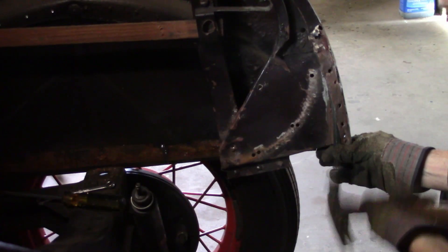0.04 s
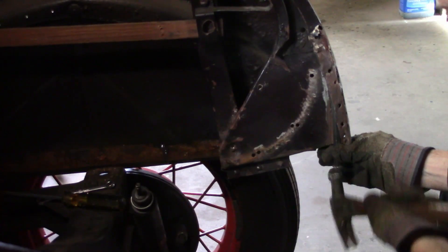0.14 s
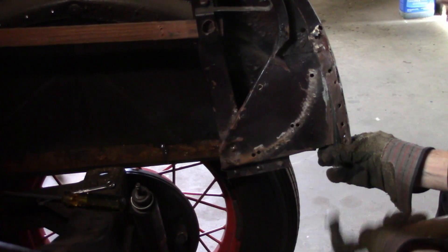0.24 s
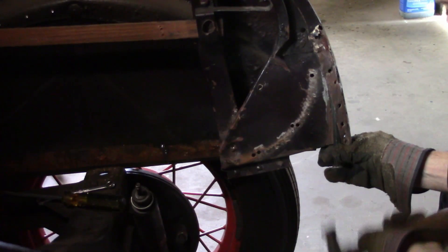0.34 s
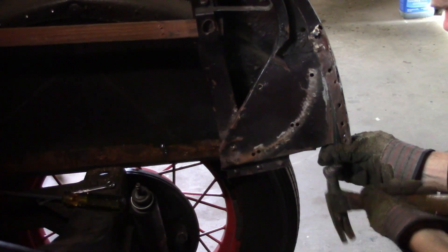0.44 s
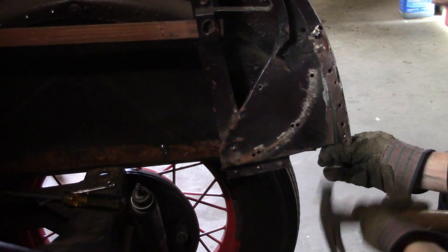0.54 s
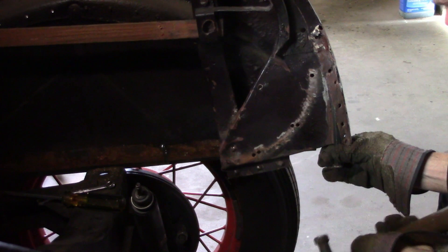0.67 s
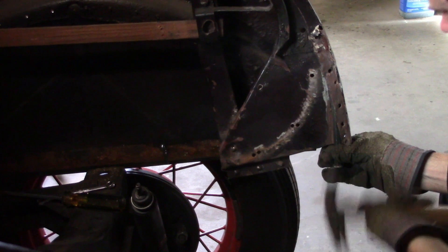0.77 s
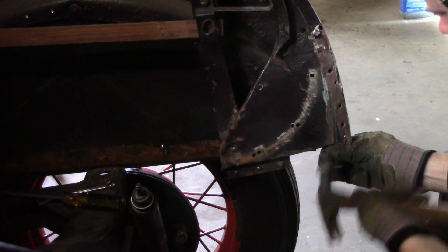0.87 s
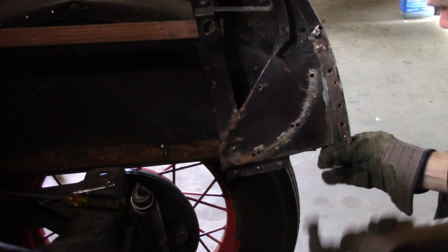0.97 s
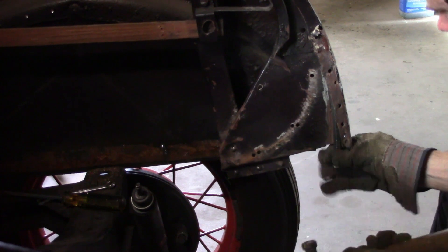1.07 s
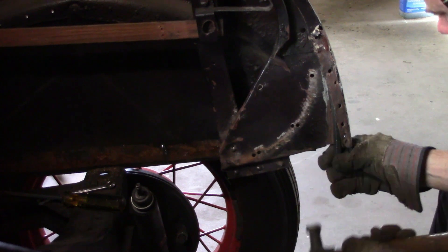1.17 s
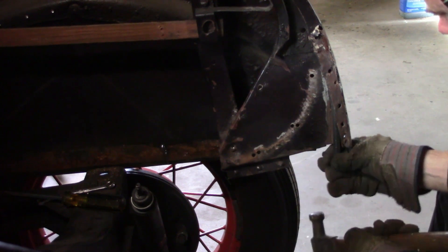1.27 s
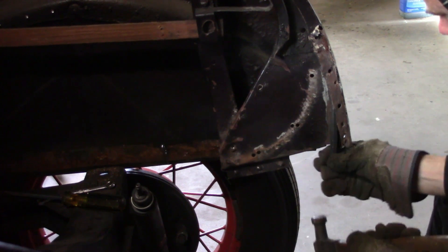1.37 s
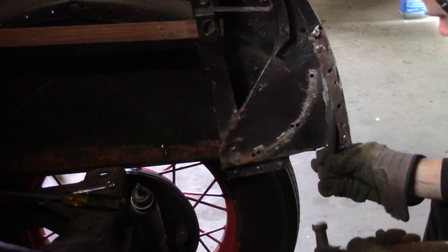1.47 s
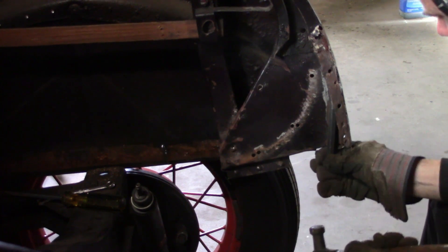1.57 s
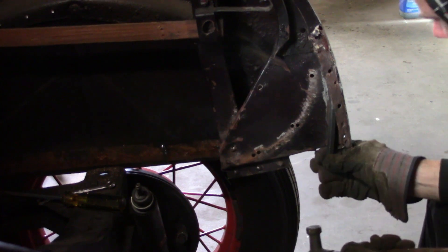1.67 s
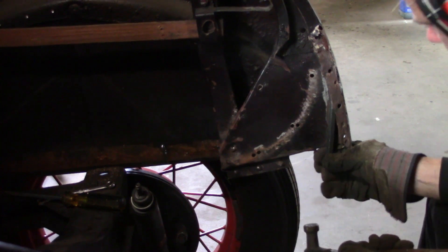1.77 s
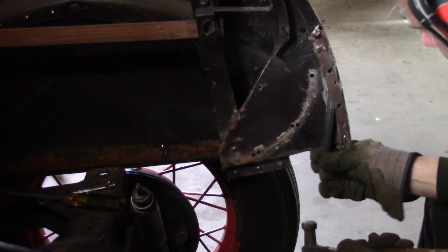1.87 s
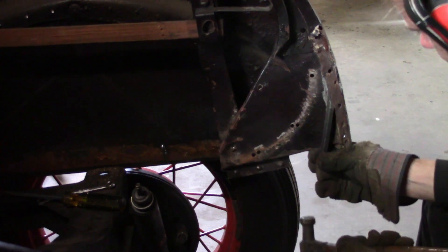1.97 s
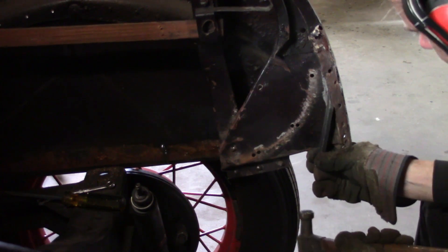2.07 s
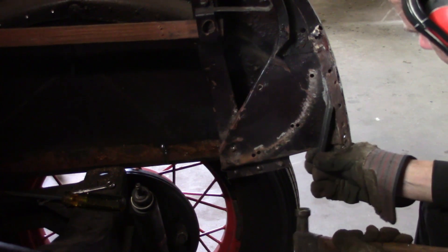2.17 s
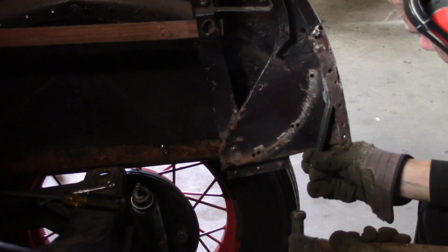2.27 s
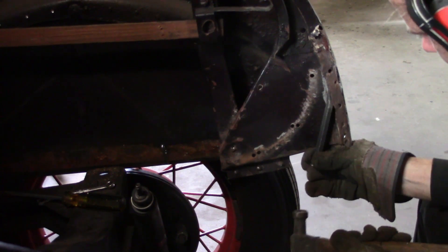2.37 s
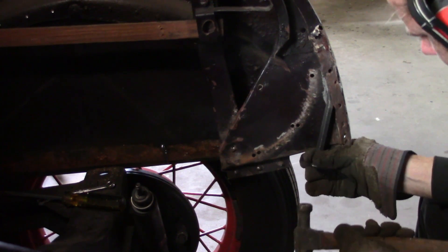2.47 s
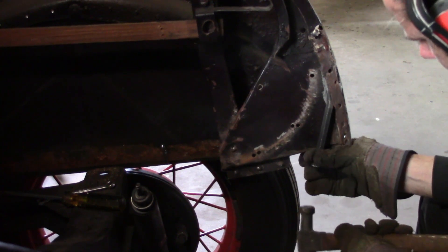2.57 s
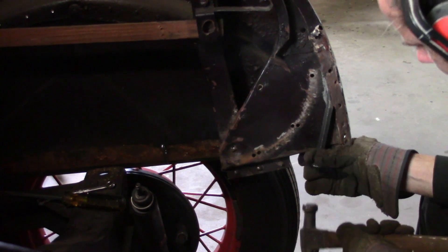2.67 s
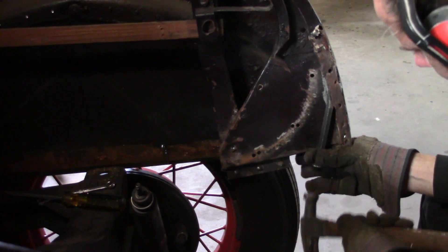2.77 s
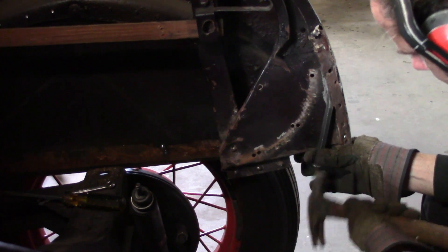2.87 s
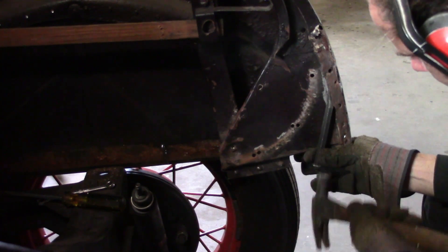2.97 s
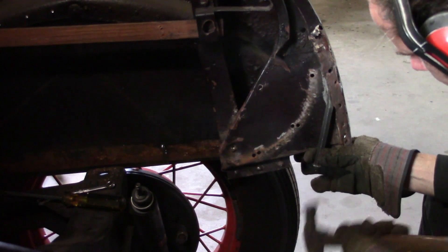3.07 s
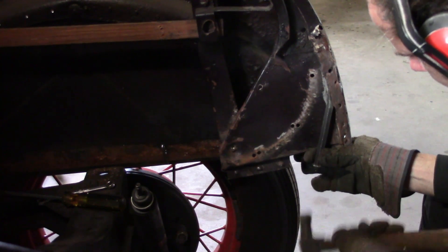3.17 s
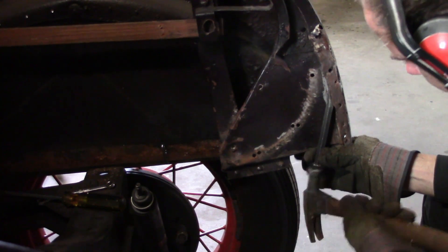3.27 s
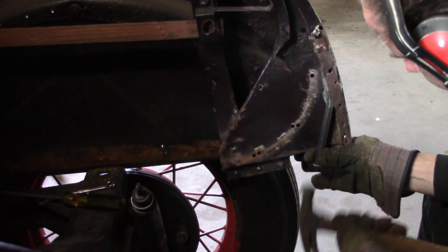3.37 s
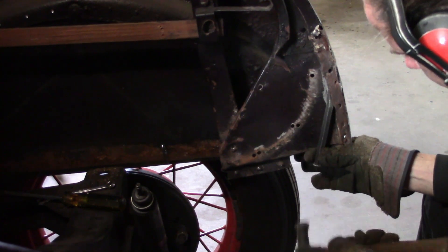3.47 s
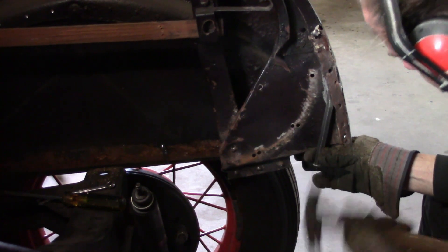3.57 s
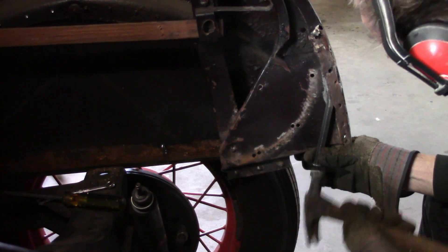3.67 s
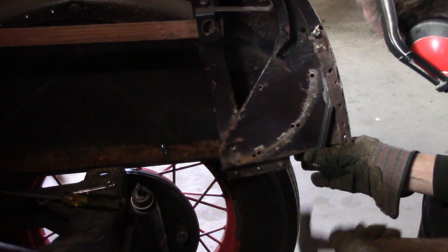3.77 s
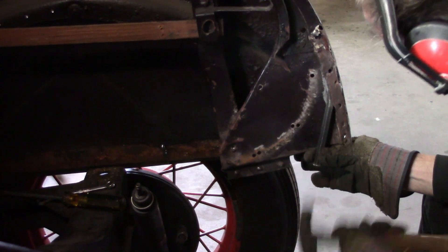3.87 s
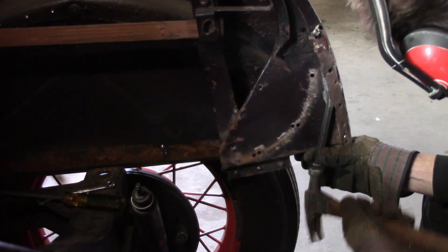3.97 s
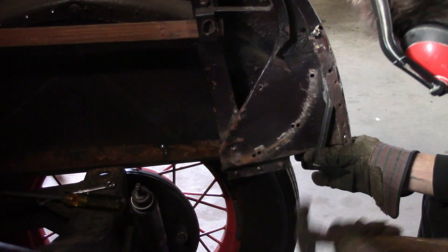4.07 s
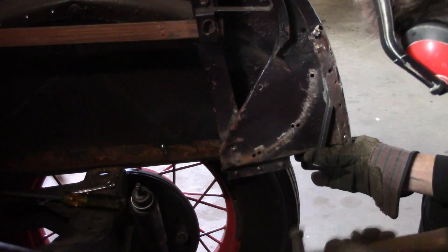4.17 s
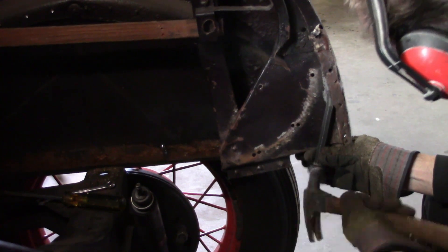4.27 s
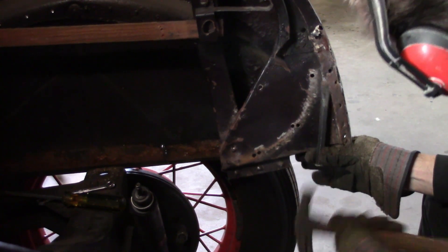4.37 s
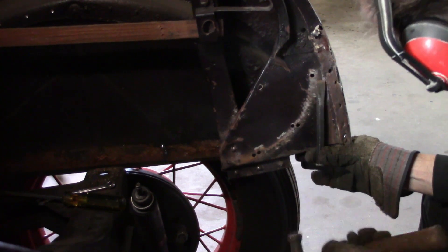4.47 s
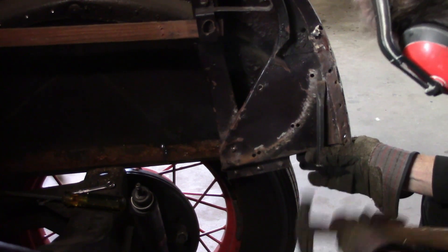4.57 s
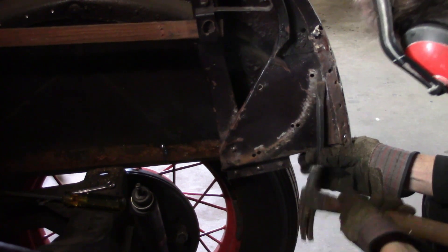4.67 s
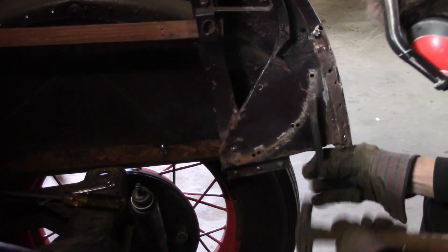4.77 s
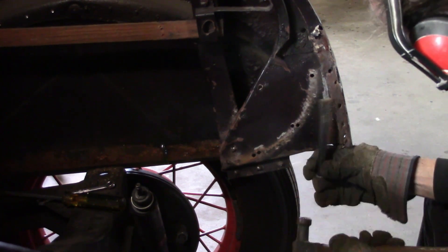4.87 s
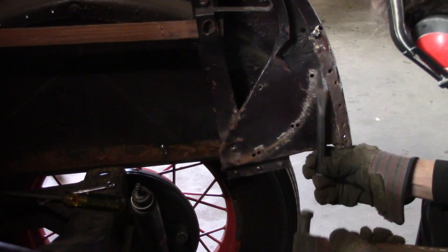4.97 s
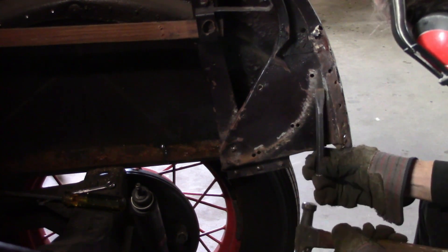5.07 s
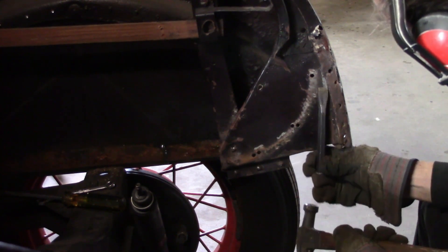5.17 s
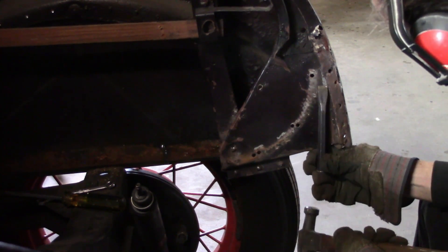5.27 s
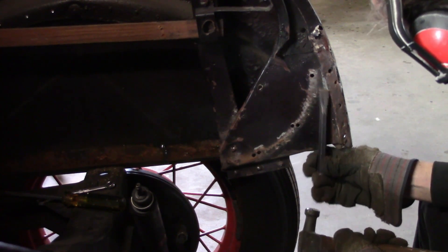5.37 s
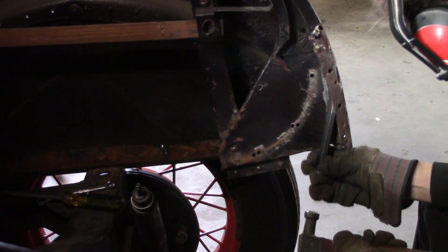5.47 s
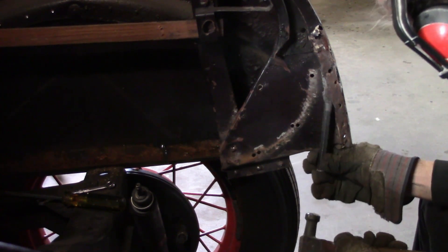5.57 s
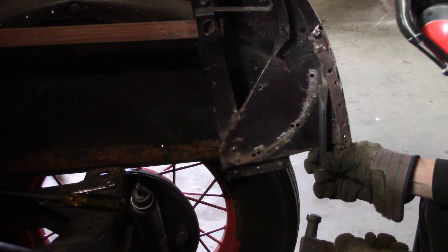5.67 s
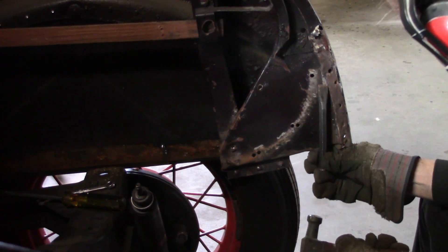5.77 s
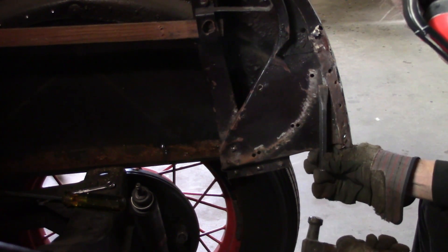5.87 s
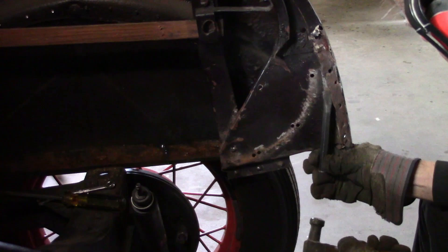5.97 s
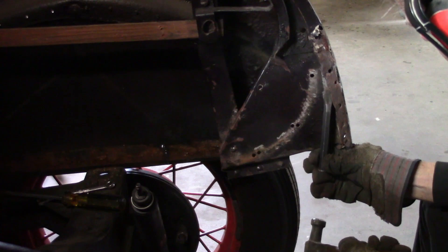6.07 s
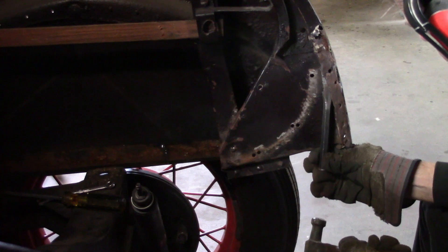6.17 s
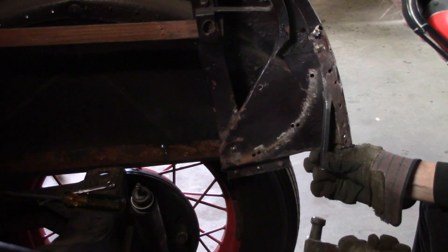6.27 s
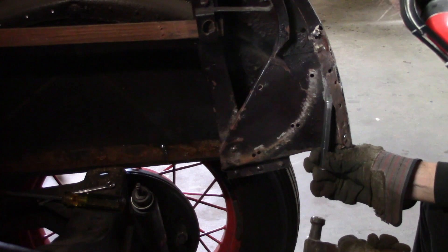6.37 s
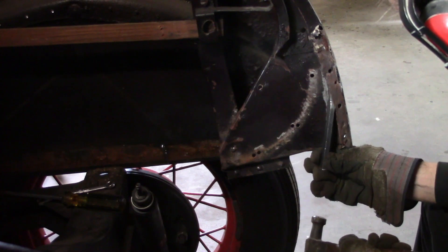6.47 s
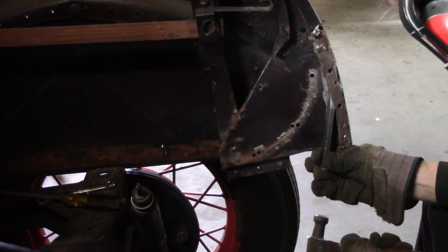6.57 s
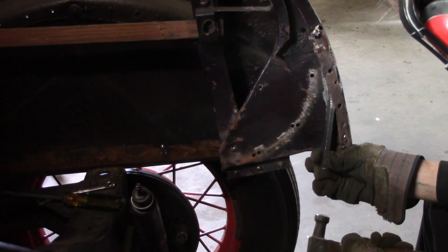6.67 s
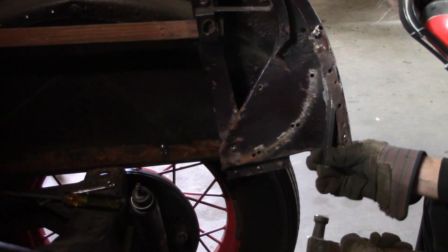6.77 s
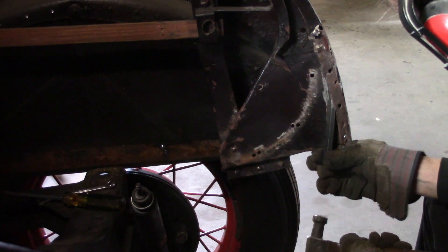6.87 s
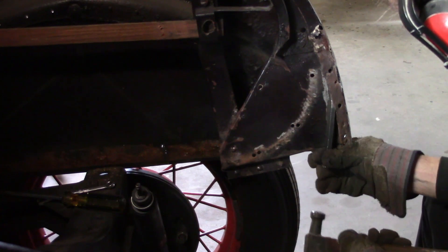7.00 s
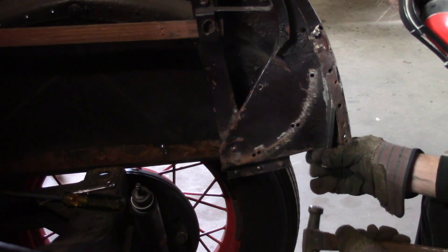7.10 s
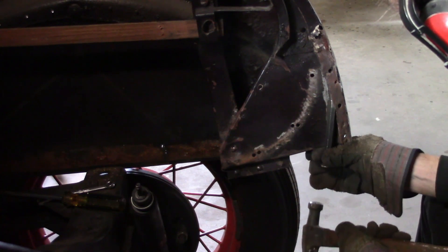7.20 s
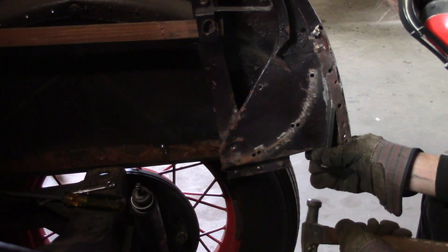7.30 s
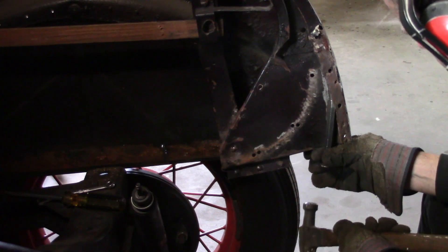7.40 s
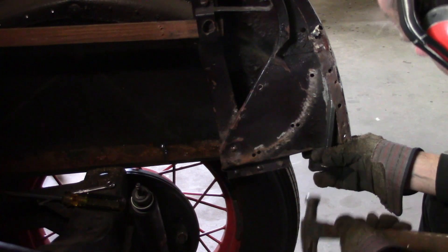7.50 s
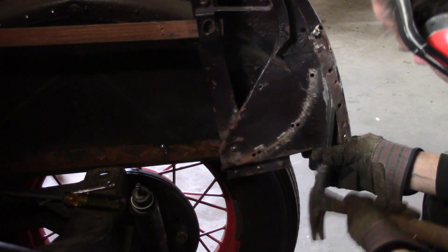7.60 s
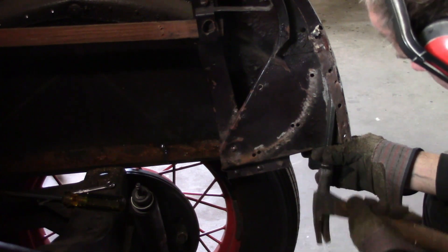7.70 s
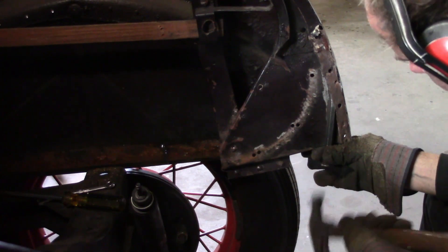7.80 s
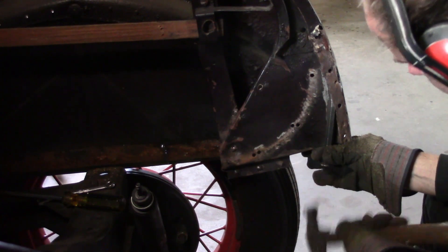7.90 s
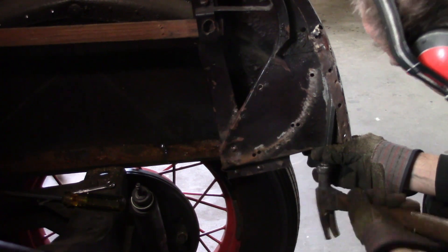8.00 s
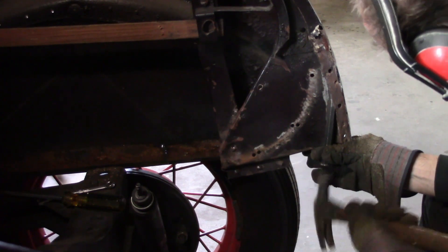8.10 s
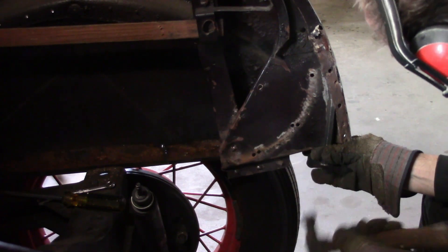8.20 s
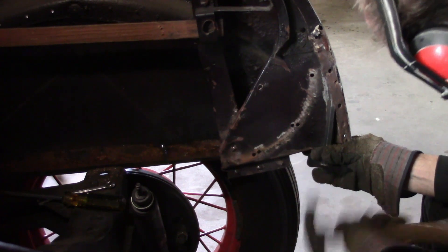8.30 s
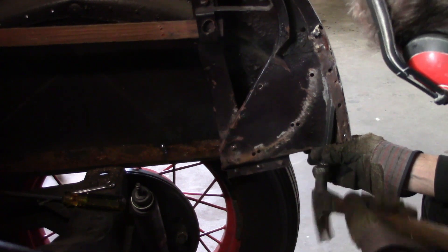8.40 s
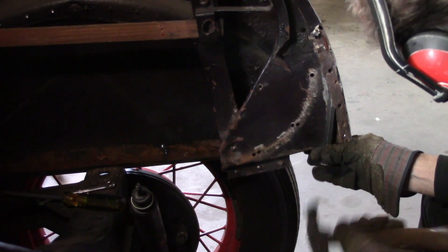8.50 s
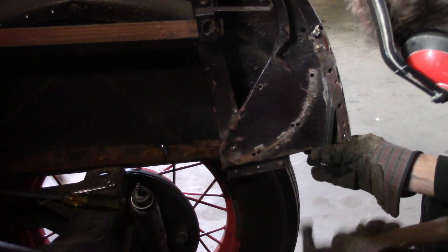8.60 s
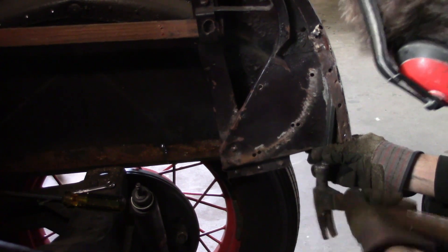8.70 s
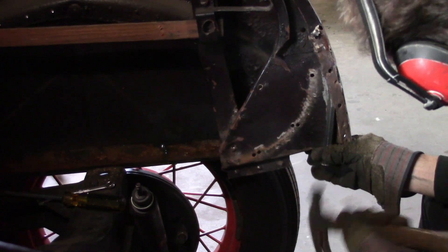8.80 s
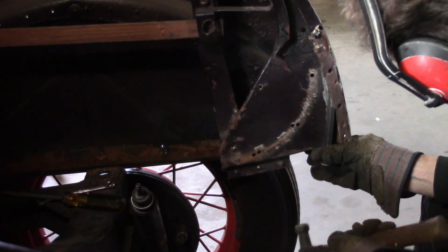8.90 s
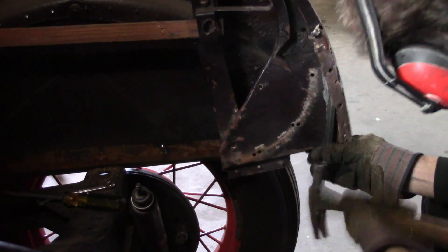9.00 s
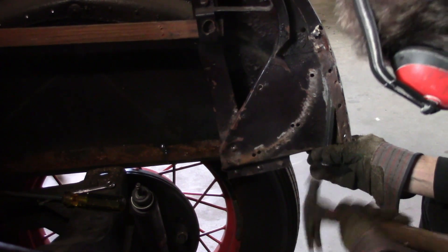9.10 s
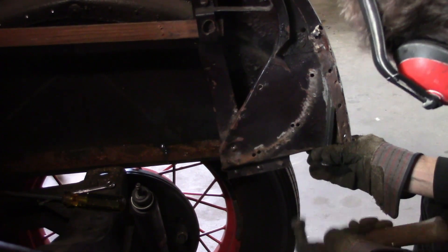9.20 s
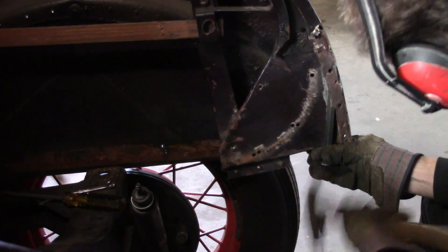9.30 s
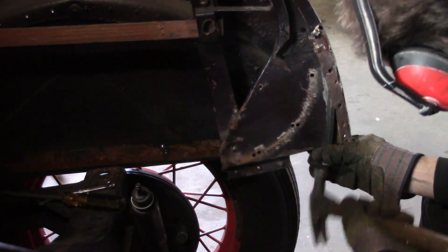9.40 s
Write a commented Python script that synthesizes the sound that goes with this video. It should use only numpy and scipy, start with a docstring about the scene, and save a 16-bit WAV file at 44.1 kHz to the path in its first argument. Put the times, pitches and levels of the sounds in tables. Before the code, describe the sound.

A chisel is hammered into a thin rusty metal panel in bursts of sharp, clattering blows, with quiet repositioning knocks and scratches in the pauses.

```python
"""The clatter of a blow already struck is heard first; three runs of hammer blows follow, through a steel chisel
into a rusty sheet-metal panel in a garage. Between the runs the chisel knocks, scrapes and crumbles rust as it
is moved, and once the hammer just clinks on it. Noise shaped by spectra and dying sines make the metal.
The recorder's limiter flattens each hard blow into a crack and a held clatter, which now and then thins briefly
and then dies away. A faint hush and ticking lie beneath."""
import sys
import numpy as np
from scipy import signal
from scipy.fft import rfft, irfft
from scipy.io import wavfile
from scipy.ndimage import uniform_filter1d, minimum_filter1d

SR = 44100
rng = np.random.default_rng(int(sys.argv[2]) if len(sys.argv) > 2 else 0)


def write(x):
    x = np.atleast_2d(x).T
    wavfile.write(sys.argv[1], SR, np.round(np.clip(x, -1, 1) * 32767).astype(np.int16))


N = 416744  # length [samples]
T = np.arange(SR) / SR  # time since a contact [s]


def amp(db):
    """Decibels to gain."""
    return 10 ** (np.asarray(db) / 20)


def evened(x):
    """Scaled to rms 1."""
    return x / np.sqrt(np.mean(x ** 2) + 1e-20)


def dying(t, t60):
    """A decay of 60 dB in t60 seconds."""
    return np.exp(-np.log(1000) * t / t60)


def read(points, hz):
    """A table of (frequency, value) read on a log-frequency axis."""
    table_hz, value = np.transpose(points)
    return np.interp(np.log(hz + 1), np.log(table_hz + 1), value)


def add(mix, s, sound):
    """Mixes a sound in from time s on; whatever falls before the start is cut."""
    start = round(s * SR)
    sound = sound[max(-start, 0):]
    part = mix[max(start, 0):][:len(sound)]
    part += sound[:len(part)]


def noise(spectrum, size):
    """Noise of rms 1 with the given spectrum."""
    gain = amp(read(spectrum, np.fft.rfftfreq(size, 1 / SR)))
    return evened(irfft(rfft(rng.standard_normal(size)) * gain, size))


def ring(modes, uneven_db):
    """Dying sines in random phase; each contact can share its energy among them a little differently."""
    hz, db, t60 = np.float32(modes).T[:, :, None]
    phase, share = np.float32(rng.random((2, len(modes), 1)))
    t = np.float32(T)
    fade = np.exp(-np.float32(np.log(1000)) * t / t60)
    level = amp(db + uneven_db * (2 * share - 1.5))
    return (level * fade * np.sin(2 * np.pi * (hz * t + phase))).sum(0)


def nearness(hz, lip_hz):
    """1 on the lip's own note, falling to 0 away from it."""
    width_hz = 50 + .07 * lip_hz
    return 1 / (1 + ((hz - lip_hz) / width_hz) ** 2)


# how fast the clatter dies, band by band: (frequency [Hz], t60 [s])
CLATTER_DECAY = [(150, 0.72), (350, 0.56), (600, 0.45), (1100, 0.44), (2200, 0.35), (4500, 0.36),
                 (10000, 0.34)]


def clatter(spectrum, tint, swell_s, lip_hz, lip_db, cluster_db=2.5, drift_db=3.0, lip_fade_s=0.47):
    """Countless modes dying band by band; a lip of torn metal briefly lifts those near its own note."""
    hz, t, z = signal.stft(noise(spectrum, SR), SR, nperseg=1024)
    # each point of contact favours its own clusters of upper modes, and they drift as the sheet flexes back
    clusters = evened(uniform_filter1d(rng.standard_normal((len(hz), 1)), size=3, axis=0))
    drift = uniform_filter1d(rng.standard_normal(z.shape), size=4, axis=0)
    drift = evened(uniform_filter1d(drift, size=9, axis=1))
    upper_share = (hz / (hz + 250))[:, None]
    lumps_db = (cluster_db * clusters + drift_db * drift) * upper_share
    z = z * amp(read(tint, hz)[:, None] + lumps_db - 0.5)
    # the lip's note sinks back into the clatter
    z *= amp(lip_db * nearness(hz, lip_hz)[:, None] * np.exp(-t / lip_fade_s))
    z *= dying(t, read(CLATTER_DECAY, hz)[:, None])
    # slow bending waves need time to fill the panel and the room, so the bass swells in late
    band_swell_s = swell_s * (260 / (hz[:, None] + 1)) ** 0.76
    z *= np.sqrt(1 - np.exp(-(t + 0.0048) / band_swell_s))
    return signal.istft(z, SR, nperseg=1024)[1][:SR]


# centres of boom, thunk, body, clang and fizz, the bands that colour a contact: (frequency [Hz])
BAND_HZ = [170, 450, 950, 2300, 6500]


def sheet(colour, modes, spectrum, modes_db, swell_s, lip_hz, lip_db, lip_share=0.62):
    """The sheet metal's answer to one contact; the colour depends on where and how firmly the chisel bites."""
    tint = list(zip(BAND_HZ, [colour[0], 0, *colour[1:]]))  # the thunk is the 0 dB reference
    tinted = []
    for hz, db, t60 in modes:
        lift_db = lip_share * lip_db * nearness(hz, lip_hz)
        tinted.append((hz, db + read(tint, hz) + lift_db, t60))
    clear = ring(tinted, uneven_db=0.0) * (1 - np.exp(-T / swell_s))
    return clatter(spectrum, tint, swell_s, lip_hz, lip_db) + amp(modes_db) * clear


def tilted(colour, db_per_octave):
    """A colour tipped about the thunk: a sharp contact is brighter, a blunt one duller."""
    boom_hz, thunk_hz, *upper_hz = BAND_HZ
    octaves = np.log2(np.array([boom_hz, *upper_hz]) / thunk_hz)
    return np.array(colour) + db_per_octave * octaves


# the crack of steel on steel: (frequency [Hz], density [dB per Hz])
CRACK_SPECTRUM = [(40, -56), (100, -39.5), (500, -7), (2000, 3.5), (4000, -2.5), (7000, -0.5), (11000, -6),
                  (16000, -27)]


def crack(length_s):
    """The bright first milliseconds of a contact, as noise that dies exponentially."""
    return noise(CRACK_SPECTRUM, SR) * np.exp(-T / length_s)


# the wash of the chisel shank's close, hand-damped modes: (frequency [Hz], density [dB per Hz])
ZING_SPECTRUM = [(20, -70), (4800, -35), (5600, -8), (5900, 0), (6250, 0), (6500, -14), (7500, -35),
                 (16000, -60)]


def zing(t60):
    """The chisel's shank: modes too close to tell apart, as a narrow band of dying noise."""
    return noise(ZING_SPECTRUM, SR) * dying(T, t60)


# the panel's countless modes, blurred by the garage: (frequency [Hz], density [dB per Hz])
PANEL_WASH = [(30, -37.5), (80, -52.5), (110, -4.5), (170, -2.5), (330, 4), (560, 0), (1100, -5.5),
              (2500, -5), (3700, -17.5), (6400, -21.5), (8200, -25.5), (10300, -31), (12500, -40.5),
              (16000, -47)]


def passing_modes(db=-23, count=30):
    """Upper modes that come and go as the chisel's point moves along the seam; they die with the clatter."""
    # one at random in each of the even log-frequency steps from 800 to 7200 Hz
    mode_hz = 800 * 9 ** ((np.arange(count) + rng.random(count)) / count)
    return [(hz, db + read(PANEL_WASH, hz), read(CLATTER_DECAY, hz)) for hz in mode_hz]


# clearest modes of the panel: (frequency [Hz], level [dB], t60 [s])
PANEL_MODES = [(164.5, -26.5, 0.96), (178, -16, 0.73), (228.4, -28, 0.94), (257, -16, 0.62),
               (338, -32, 0.92), (332, -8.5, 0.59), (368, -3, 0.33), (469, -31.5, 0.88), (507, -13, 0.55),
               (573.5, -13.5, 0.56), (606, -12, 0.46), (643, -12.5, 0.39), (757, -20, 0.45),
               (893, -17.5, 0.46), (986, -20, 0.3), (1137, -13, 0.39), (1465, -20, 0.26),
               (1602, -18.5, 0.45), (1930, -15.5, 0.25), (2044, -16, 0.39)]
# the chisel pressed into the panel; its main note is a beating pair: (frequency [Hz], level [dB], t60 [s])
WEDGED_CHISEL_MODES = [(3780, -3, .22), (5650, -3, .2), (5895, -3, .22), (6207, 1, .22), (6682, 7, .36),
                       (6689, 0, .36), (7105, -1, .22), (7220, -3, .22)]
# hard blows: (time [s], force [dB], cut-off of the contact [Hz], ring of the chisel [dB],
# zing of its shank [dB], note of the torn lip of metal [Hz], its lift [dB], boom [dB], body [dB], clang [dB])
HARD_BLOWS = [(-.045, -11, 9600, -8, -3.5, 1350, 8.5, -1.5, 0, 1),
              (.332, -10, 6960, -13, -17, 1500, 10, 3.5, 0.5, -2),
              (.712, -11.5, 5500, -24, -14, 1780, 6.5, -6.5, 2.5, 2),
              (2.818, -20, 4600, -14.5, -6.5, 1700, 10, -4.5, -2, 1.5),
              (3.174, -8, 11100, -12, -7, 1210, 7.5, -3, -3, 2.5),
              (3.523, -6, 9500, -12.5, -28, 4400, 11, -3, -1, 0),
              (3.845, -4.5, 13500, -36, -30, 4000, 5, -4.5, -0.5, 2),
              (4.179, -1.5, 13400, -39, -13, 2050, 10, -5, -0.5, -1),
              (7.541, -15.5, 13070, -12.5, -9.5, 2940, 8.5, -10.5, 0, -2.5),
              (7.903, -8.5, 8700, -30, -30, 2040, 4, -1.5, 3, 1.5),
              (8.277, -5.5, 12100, -30, -8, 2680, 6.5, -4.5, 2.5, 0.5),
              (8.609, -5.5, 13100, -38, -14, 2000, 10.5, -3.5, 5.5, -2.5),
              (8.937, -7.5, 11600, -8, -7, 890, 7.5, -3.5, -1, 2.5),
              (9.256, -6, 13500, -13, -9.5, 2600, 6, -7.5, 1, -2)]


def hammering(crack_db=4, chisel_db=-5.0, fizz_db=5.5):
    """Each blow cracks, rings the chisel and shakes the whole panel; a longer contact cuts the top."""
    out = np.zeros(N)
    for s, force_db, contact_hz, ring_db, zing_db, lip_hz, lip_db, *colour in HARD_BLOWS:
        steel = amp(crack_db) * crack(length_s=0.011)
        steel += amp(chisel_db + ring_db) * ring(WEDGED_CHISEL_MODES, uneven_db=1.5)
        steel += amp(zing_db) * zing(t60=.3)
        body = sheet([*colour, fizz_db], PANEL_MODES + passing_modes(), PANEL_WASH,
                     modes_db=0.5, swell_s=0.014, lip_hz=lip_hz, lip_db=lip_db)
        contact = signal.butter(N=2, Wn=min(contact_hz, SR * .45), fs=SR, output="sos")
        add(out, s, amp(force_db) * signal.sosfilt(contact, steel + body))
    return out


# the hush of the garage: (frequency [Hz], density [dB per Hz])
HUSH_SPECTRUM = [(15, -76), (25, -47.5), (120, -6), (560, -7.5), (714, -12.5), (840, -14), (1610, -14.5),
                 (2000, -18.5), (3340, -25), (3720, -24), (4030, -26), (16000, -39)]


def background(hush_db=-71.5, tick_db=-60, clearest_s=2.3885, ticks_per_s=15, tick_hz=1800, tick_s=.003,
               fade_db_per_s=2.0):
    """Steady shaped noise for the hush, and a faint regular ticking of short sines that rises and fades."""
    t = np.arange(N) / SR - clearest_s
    index, since = np.divmod(t, 1 / ticks_per_s)
    uneven_db = -3 * rng.random(256)[index.astype(int)]
    ticks = amp(uneven_db) * np.sin(2 * np.pi * tick_hz * since) * np.exp(-since / tick_s)
    return amp(hush_db) * noise(HUSH_SPECTRUM, N) + amp(tick_db - fade_db_per_s * abs(t)) * ticks


# clearest modes of the loose edge, with no chisel wedged against it: (frequency [Hz], level [dB], t60 [s])
EDGE_MODES = [(378.5, -5.5, 0.48), (464, -20, 0.67), (516.5, -17, 0.58), (563, -19, 0.55), (612, -33, 0.4),
              (678.4, -11.5, 0.43), (686, -24, 0.8), (753, -20.5, 0.62), (901, -13.5, 0.35),
              (987, -20.5, 0.54), (1170, -11, 0.26), (1225, -21.5, 0.49), (1458, -17, 0.19),
              (1600, -20, 0.42), (1680, -29, 0.47), (1910, -20, 0.2), (2080, -24, 0.46), (2670, -19.5, 0.2),
              (2780, -20.5, 0.29), (2950, -22.5, 0.21), (3300, -18, 0.18), (3435, -20.5, 0.28),
              (3640, -21.5, 0.2)]
# the wash of its other modes: (frequency [Hz], density [dB per Hz])
EDGE_WASH_SPECTRUM = [(30, -48.5), (75, -38), (115, 1), (200, 1), (280, 0.5), (420, 1), (1150, -4.5),
                      (1400, -6.5), (2000, -7), (2300, -14), (2750, -7.5), (3400, -10.5), (4200, -13),
                      (6400, -12), (10300, -22.5), (16000, -54)]


def loose_edge(colour, modes_db, swell_s, lip_hz, lip_db, ring_share=1):
    """The panel's loose edge answers a contact; the share scales how long its clear modes ring."""
    modes = [(hz, db, t60 * ring_share) for hz, db, t60 in EDGE_MODES]
    return sheet(colour, modes, EDGE_WASH_SPECTRUM, modes_db, swell_s, lip_hz, lip_db)


# the chisel knocks on the loose edge as it is set: (time [s], force [dB], brightness [dB per octave],
# note of the touched lip of metal [Hz], boom [dB], clang [dB], ring time [share of the free edge's])
CHISEL_KNOCKS = [(1.2, -55.5, -1.5, 293, 4.5, -5, 0.55), (1.432, -51.5, -6, 317, -4.5, -1, .3),
                 (1.485, -54, -14, 356, -17.5, -7.5, 0.33), (2.0563, -20, -3, 800, -19, -4.5, 0.53),
                 (2.2, -44, -2.5, 433, -6.5, -8, 0.68), (4.928, -21.5, 0.65, 1000, -19, -11, 1.11),
                 (5.075, -39.5, 1, 660, 0.5, -4, 0.58), (5.375, -37, 3, 900, -10, 2, 0.79),
                 (5.397, -21, -0.5, 1100, -16, -5, 1.02), (5.55, -40, 1, 370, -16, -5, 1.02),
                 (5.9, -21, 2.5, 2920, -8.5, -3, 0.97), (6.07, -27.5, 0, 1860, -17.5, -5, 0.84),
                 (6.36, -40.5, 0.5, 890, -14, -20, 0.49), (6.695, -44, -0.5, 2050, -5.5, -3.5, 0.77),
                 (6.954, -58.5, 1, 540, -2, -8.5, 0.79)]


def knocking(tick_db=-4, body_db=-2.5, fizz_db=-19.5):
    """Light knocks leave the edge's clear modes ringing, for less long when the chisel stays pressed on it."""
    out = np.zeros(N)
    for s, force_db, brightness, lip_hz, boom_db, clang_db, ring_share in CHISEL_KNOCKS:
        colour = tilted([boom_db, body_db, clang_db, fizz_db], brightness)
        tick = amp(tick_db + colour[-1]) * crack(length_s=0.022)
        edge = loose_edge(colour, modes_db=8, swell_s=0.0078, lip_hz=lip_hz, lip_db=9.5,
                          ring_share=max(ring_share, .1))
        add(out, s, amp(force_db) * (tick + amp(-4.5) * edge))
    return out


def slips(length_s, per_s):
    """A run of tiny catches at random moments that swells and fades, of energy 1."""
    size = int(max(length_s, .01) * SR)
    caught = rng.random(size) < per_s / SR
    catches = rng.standard_normal(size) * caught * np.hanning(size)
    return catches / (np.linalg.norm(catches) + 1e-9)


# colour of a scrape before its brightness tips it: boom, body, clang, fizz (level [dB])
SCRAPE_TINT = [-7.5, -6.5, -4, -18.5]
# the chisel's edge drags over rust: (time [s], length [s], level [dB], brightness [dB per octave],
# note of the touched lip of metal [Hz])
CHISEL_SCRAPES = [(1.582, .028, -57, -1.5, 1300), (1.7, .04, -61.5, 1.5, 630),
                  (1.816, 0.029, -57, .5, 1500), (1.878, 0.048, -58, 1.5, 1840),
                  (4.871, 0.042, -58, 0, 3500), (5.279, .03, -43.5, -1.5, 760),
                  (5.688, .019, -50, -3, 1010), (6.29, 0.042, -43.5, 2.1, 925),
                  (6.337, .035, -41.5, 1.85, 1010), (6.474, 0.05, -52.5, -0.5, 370),
                  (6.604, 0.043, -55.5, -0.5, 750), (6.99, .04, -68.5, 2.5, 4200)]


def scraping(slips_per_s=900):
    """The chisel catches on rust in many tiny slips, each a small blow to the loose edge."""
    out = np.zeros(N)
    for s, length_s, db, brightness, lip_hz in CHISEL_SCRAPES:
        colour = tilted(SCRAPE_TINT, brightness)
        edge = loose_edge(colour, modes_db=3, swell_s=0.012, lip_hz=lip_hz, lip_db=8)
        add(out, s, amp(db) * signal.fftconvolve(edge, slips(length_s, slips_per_s)))
    return out


# the chisel held free: (frequency [Hz], level [dB], t60 [s])
FREE_CHISEL_MODES = [(2369, -26, .3), (3440, -40, .24), (5604, -24, .3), (5884, -6, .2), (6040, -15, .3),
                     (6212, 0, .12), (6681, -12.5, .4), (10430, -1, .1), (10420, -24, .27),
                     (11745, -25, .18)]
# the hammer taps the free chisel and rebounds on it: (time [s], force [dB])
HAMMER_CLINKS = [(4.5743, -23), (4.59, -25.5)]


def clink(room_db=-9, room_t60=0.14, zing_db=-19, stir_db=-22):
    """High modes of the free chisel, their wash in the garage, and a faint stir of the loose edge."""
    out = np.zeros(N)
    for s, force_db in HAMMER_CLINKS:
        steel = ring(FREE_CHISEL_MODES, uneven_db=-1.0) + amp(-8) * crack(length_s=0.0054)
        room = rng.standard_normal(SR) * dying(T, room_t60)
        wash = amp(room_db) * signal.fftconvolve(steel, room / np.linalg.norm(room))[:SR]
        shank = amp(zing_db) * zing(t60=0.35)
        stir = loose_edge([-11.5, -2.5, 5.0, -2.0], modes_db=10, swell_s=0.014, lip_hz=2300, lip_db=9.5)
        add(out, s, amp(force_db) * (steel + wash + shank + amp(stir_db) * stir))
    return out


# the thin rasp of rust flakes: (frequency [Hz], density [dB per Hz])
RUST_SPECTRUM = [(20, -40), (1500, -12), (4500, -5), (8000, 2), (11000, -8.5), (16000, -14)]
# flakes of rust crumble under the edge: (time [s], length [s], level [dB])
RUST_CRUMBS = [(6.14, 0.072, -69), (6.261, 0.047, -68), (6.331, .04, -56.5), (6.473, 0.052, -67.5),
               (6.581, .03, -72), (6.616, .01, -67.5), (6.645, .05, -71), (6.957, .04, -80),
               (7.005, .02, -78), (7.128, .015, -78), (7.17, .012, -76)]


def crumbling(flakes_per_s=700, fade_s=0.022, snap_db=10, snap_s=0.00041):
    """Each flake of rust snaps, and its rasp lingers briefly in the garage."""
    out = np.zeros(N)
    for s, length_s, db in RUST_CRUMBS:
        envelope = np.exp(-T / fade_s) + amp(snap_db) * np.exp(-T / snap_s)
        flake = noise(RUST_SPECTRUM, SR) * envelope
        add(out, s, amp(db) * signal.fftconvolve(flake, slips(length_s, flakes_per_s)))
    return out


def limit(x, limit_db, attack_s, recovery_db_per_s, treble_bias=0):
    """Turns the gain down by as much as the sound exceeds the limit, and lets it creep back."""
    # with a treble bias the detector hears treble best, so the boom comes forward as the brightness dies
    treble = signal.lfilter(*signal.butter(1, 3000, "high", fs=SR), x)
    sensed = x + treble_bias * treble
    power = abs(uniform_filter1d(sensed ** 2, size=241, origin=120))
    power_db = 10 * np.log10(power + 1e-12)
    # the held peak sinks at the recovery rate until something louder comes
    fall_db = np.arange(N) / SR * recovery_db_per_s
    held_db = np.maximum.accumulate(power_db + fall_db) - fall_db
    over_db = np.maximum(held_db - limit_db, 0)
    lag = np.exp(-1 / (attack_s * SR))
    cut_db = signal.lfilter([1 - lag], [1, -lag], over_db, zi=[lag * over_db[0]])[0]
    return x * amp(-cut_db)


# the clatter thins for a moment to a few clear notes: (centre time [s], length [s])
THIN_MOMENTS = [(0.03, 0.0073), (.396, 0.012), (0.779, 0.0069), (3.275, 0.01), (3.317, 0.0071),
                (3.59, 0.009), (4.335, 0.016), (7.58, 0.023), (7.955, 0.015), (8.682, 0.025),
                (8.734, 0.0091), (8.974, 0.025), (9.034, 0.0079), (9.288, 0.008)]


def thinned(x, note_spacing_hz=1500, top_hz=7500, from_hz=1200, hiss_db=-19):
    """For a moment the hiss between the strongest upper notes falls away; the low body carries on."""
    out, size = x.copy(), 2048
    t, hz = (np.arange(size) - size / 2) / SR, np.fft.rfftfreq(size, 1 / SR)
    low = 1 / (1 + (hz / from_hz) ** 4)
    top = 1 + (hz / top_hz) ** 12
    for s, length_s in THIN_MOMENTS:
        part = out[round(s * SR) - size // 2:][:size]
        z = rfft(part * signal.windows.tukey(size))
        # the strongest note in each bin's neighbourhood
        strongest = -minimum_filter1d(-abs(z), max(int(note_spacing_hz * size / SR), 3))
        kept = 1.6 * (abs(z) / (strongest + 1e-12)) ** 7 / top
        notes = irfft(z * (low + (1 - low) * np.maximum(kept, amp(hiss_db))))
        share = np.clip((length_s / 2 - abs(t)) / .007 + .5, 0, 1)  # 7 ms crossfades
        part += share * (notes - part)
    return out


def scene():
    """Everything at the microphone."""
    return (hammering() + background() + knocking() + scraping() + clink() + crumbling())[None]


def record(dry, ceiling=0.08, low_cut_hz=95, dull_hz=13000, edge_hz=16200):
    """Gain control, a fast peak limiter, soft clipping of what slips past, brief thinnings, then band limits."""
    held = limit(dry[0], limit_db=-23.0, attack_s=0.009, recovery_db_per_s=191.5, treble_bias=1.92)
    held = limit(held, limit_db=-23.5, attack_s=.0003, recovery_db_per_s=2500)
    clipped = ceiling * np.tanh(held / ceiling)
    out = thinned(clipped)
    out = signal.sosfilt(signal.butter(1, low_cut_hz, "high", fs=SR, output="sos"), out)
    out = signal.sosfilt(signal.butter(2, min(dull_hz, SR / 2 - 100), fs=SR, output="sos"), out)
    steep_low_pass = signal.firwin(511, edge_hz, window=("kaiser", 9), fs=SR)
    return signal.oaconvolve(out, steep_low_pass, "same")[None]


dry = scene()
out = record(dry)
write(out)
```